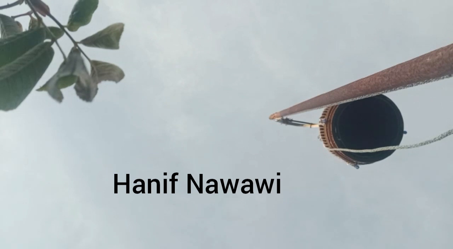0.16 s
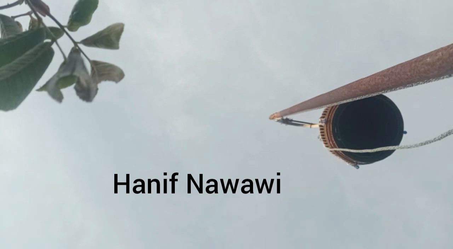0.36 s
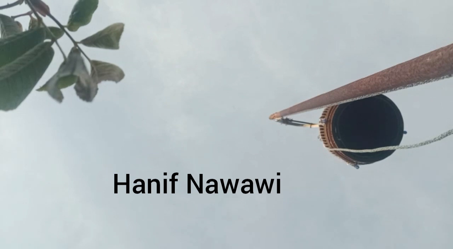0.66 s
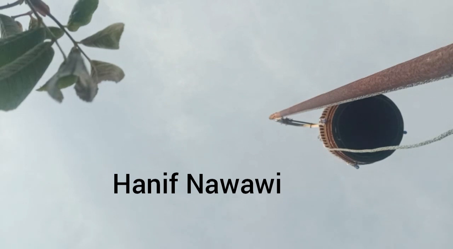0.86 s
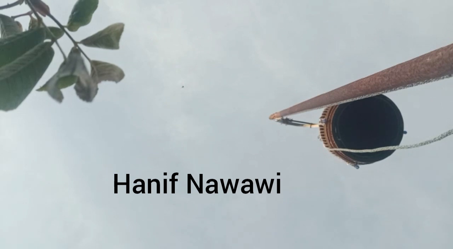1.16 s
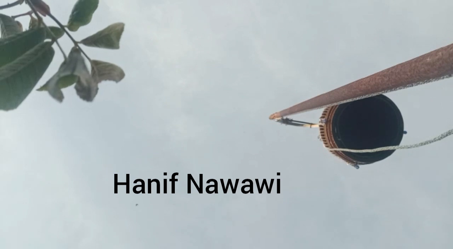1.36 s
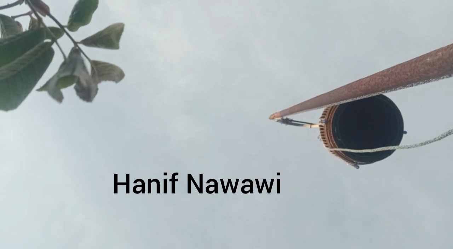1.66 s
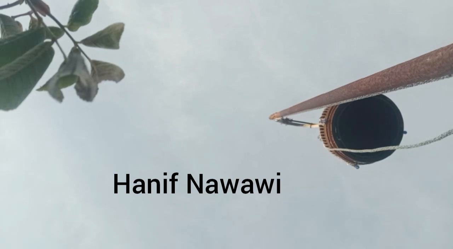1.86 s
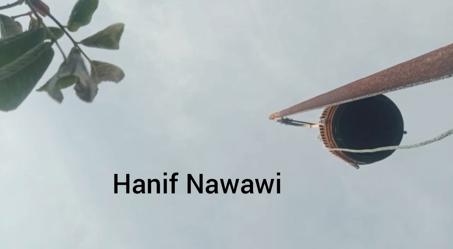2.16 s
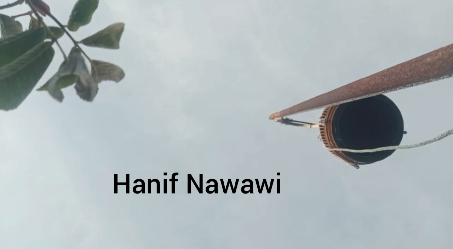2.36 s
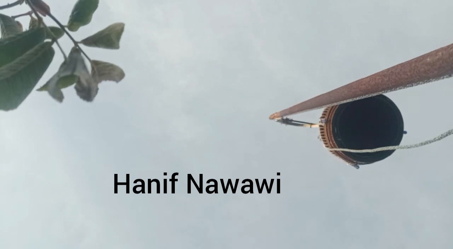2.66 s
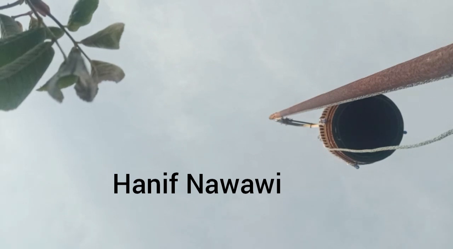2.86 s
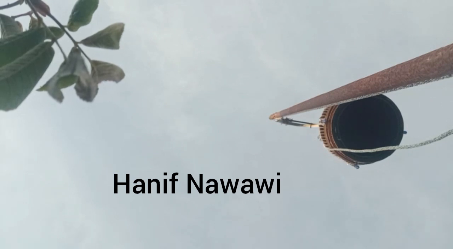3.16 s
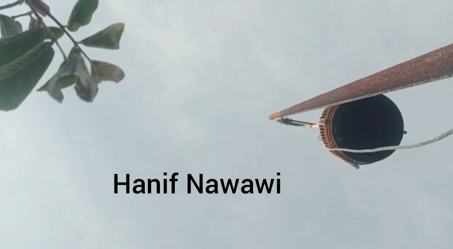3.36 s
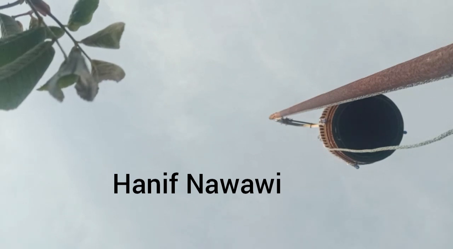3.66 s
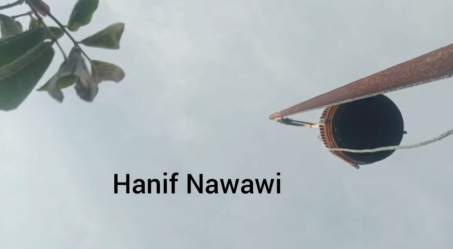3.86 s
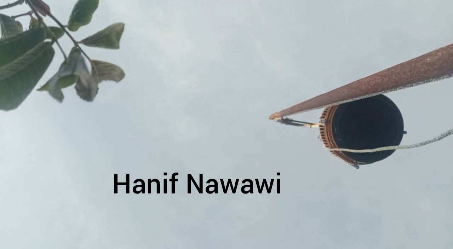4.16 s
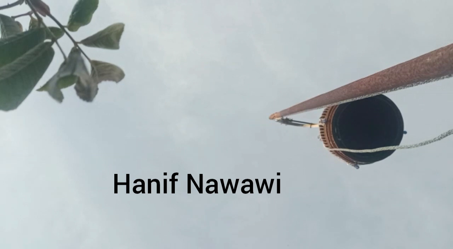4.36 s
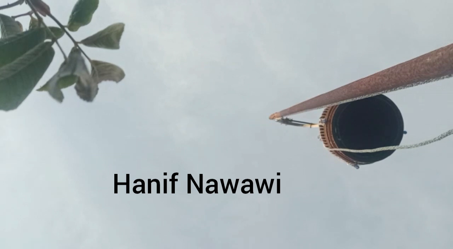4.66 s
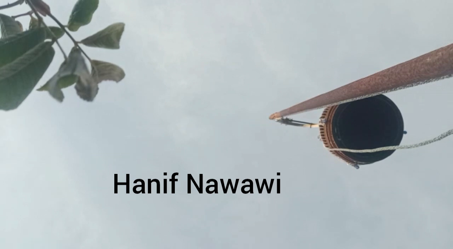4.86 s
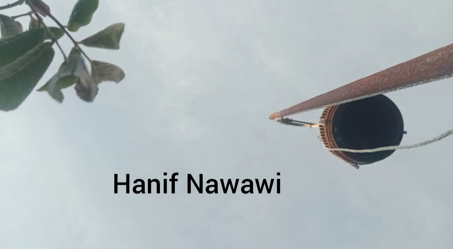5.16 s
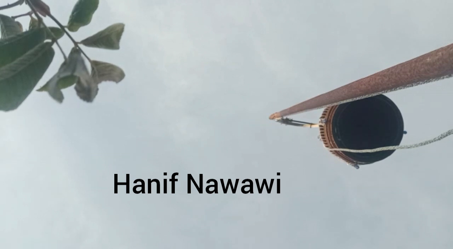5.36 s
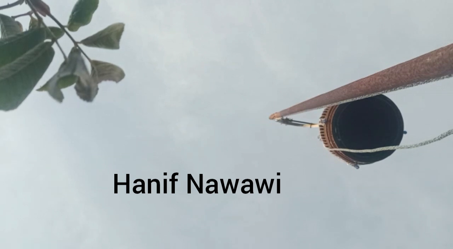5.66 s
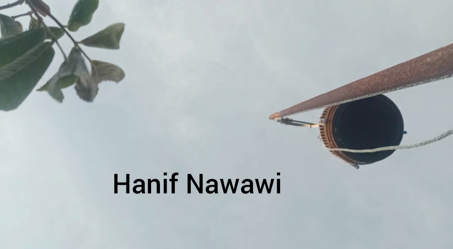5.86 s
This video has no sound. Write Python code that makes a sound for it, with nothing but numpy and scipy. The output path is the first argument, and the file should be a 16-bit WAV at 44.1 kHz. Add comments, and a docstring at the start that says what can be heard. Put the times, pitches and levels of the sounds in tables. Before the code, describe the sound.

Near dove coos, with a brief growl and a rolled note, over faint yard air, bird chirps and a late raspy trill.

```python
"""In a yard hung with cages, doves coo close by in near-sine notes that the walls and yard return.
Small birds are swept sines: a falling series and single chirps; another rattles hoarsely on pulsed noise.
An insect buzzes in pulsed noise. Shaped noise gives rustles, air, distant traffic, far doves and insects,
and far small birds are short whistles heard only as echo. The echoes and far background dip briefly.
The microphone adds hiss and the top of the treble is cut."""
import sys
import numpy as np
from scipy import signal
from scipy.fft import rfft, irfft, next_fast_len
from scipy.io import wavfile
from scipy.ndimage import uniform_filter1d

SR = 44100
rng = np.random.default_rng(int(sys.argv[2]) if len(sys.argv) > 2 else 0)


def to_wav(s):
    """Save 16-bit WAV."""
    ch = np.atleast_2d(s).T  # columns
    pcm = np.round(np.clip(ch, -1, 1) * 32767)  # PCM
    wavfile.write(sys.argv[1], SR, pcm.astype(np.int16))


N = 265041
T = np.arange(N) / SR


def amp(db):
    """Decibels to gain."""
    return 10 ** (np.asarray(db) / 20)


def rms_one(x):
    """Scale to unit rms."""
    return x / np.sqrt(np.mean(x ** 2) + 1e-20)


def in_time(rows):
    """Columns of a curve, first column in seconds, at every sample."""
    s, *columns = np.transpose(rows)
    return [np.interp(T, s, c) for c in columns]


def from_points(points):
    """Gain for each frequency from a short spectrum, straight lines over log frequency."""
    hz, level_db = np.transpose(points)
    return lambda f: amp(np.interp(np.log(f), np.log(hz), level_db))


def window(start, end, edge):
    """One between start and end, with ramps inside."""
    return np.clip(np.minimum(T - start, end - T) / edge, 0, 1)


def add(out, start, sound):
    """Mix a short sound in at a time in seconds."""
    i = max(int(round(start * SR)), 0)
    out[i:i + len(sound)] += sound[:N - i]


def sine(hz):
    """A sine that follows a pitch curve."""
    return np.sin(2 * np.pi * np.cumsum(hz) / SR)


def shaped_noise(gain_at):
    """White noise coloured by a gain for each frequency; rms 1."""
    size = next_fast_len(N)
    hz = np.maximum(np.fft.rfftfreq(size, 1 / SR), 1)
    return rms_one(irfft(rfft(rng.standard_normal(size)) * gain_at(hz), size)[:N])


def band(hz, width_hz):
    """Noise twice through a resonance; at 0 Hz it is a slow waver. Rms 1."""
    return shaped_noise(lambda f: 1 / (1 + (2 * (f - hz) / width_hz) ** 2))


def throb(per_s, sharp):
    """An uneven train of smooth bumps; rms 1."""
    phase = np.cumsum(per_s * (1 + 0.073 * band(0, 10.1))) / SR
    return rms_one(np.exp(sharp * np.cos(2 * np.pi * phase)))


def traffic():
    """Distant traffic: low noise shaped to a rumble, lumpy in level."""
    # rumble spectrum before scaling to rms 1: frequency_hz, density_db (per Hz)
    rumble_spectrum = [(25, -31.5), (45, -8), (60, -9), (69, 4), (80, 1), (110, 0), (145, -1.5), (160, 2.5),
                       (178, 0.5), (260, -49.5)]
    # slow rise and fall: time_s, level_db
    traffic_levels = [(0, -61.5), (1.8, -62), (2.5, -56), (3.3, -60.5), (3.9, -63.5), (4.5, -55),
                      (5.0, -59.5), (5.5, -64), (5.8, -54), (6.01, -59)]
    level_db = in_time(traffic_levels)[0] + 2.5 * band(0, 3.3)
    return amp(level_db) * shaped_noise(from_points(rumble_spectrum))


def murmur():
    """Far doves blurred to two narrow bands of noise."""
    # murmur before a 3.5 dB cut: time_s, level_db
    murmur_levels = [(0, -71), (2.3, -63), (2.6, -57), (3.9, -60), (4.35, -49), (5.1, -61.5), (5.5, -64.5),
                     (5.75, -52.5), (6.01, -65)]
    blur = rms_one(band(326.2, 56) + .5 * band(413, 30))
    return amp(in_time(murmur_levels)[0] - 3.5) * blur


def air():
    """Open air of the yard: octave bands of noise, each wavering in its own way."""
    air_db = -61.5
    # air spectrum before scaling to rms 1: frequency_hz, density_db (per Hz)
    air_spectrum = [(160, -26.5), (220, -6), (500, -9.5), (1000, -13), (2000, -22.5), (4000, -27),
                    (6500, -33), (8200, -38.5), (10000, -27.5), (12500, -55.5)]
    colour, out = from_points(air_spectrum), 0
    for octave_hz in 250 * 2. ** np.arange(7):
        part = lambda f: colour(f) * np.clip(1 - np.abs(np.log2(f / octave_hz)), 0, 1) ** .5
        weight = np.sqrt(octave_hz) * colour(octave_hz)
        out = out + weight * shaped_noise(part) * amp(2.7 * band(0, 36))
    return amp(air_db) * rms_one(out)


def drones():
    """Far insects as narrow bands of noise that waver in level."""
    # insect bands: centre_hz, width_hz, level_db
    drone_bands = [(1263.5, 70, -69), (1680, 250, -78), (5846, 180, -81.5)]
    return sum(amp(db + 4.2 * band(0, 16)) * band(hz, width_hz) for hz, width_hz, db in drone_bands)


def chorus():
    """Many far insects blurred to a wavering band of noise."""
    # insect chorus: time_s, level_db
    chorus_levels = [(0, -86), (.4, -84), (.7, -74), (1.05, -66.5), (1.15, -81), (1.7, -73), (2.4, -65),
                     (2.62, -86), (3.45, -72.5), (4.0, -80), (4.5, -72), (5.45, -75), (6.01, -71)]
    blur = shaped_noise(lambda f: 1 / (1 + ((f - 7150) / 380) ** 4))
    return amp(in_time(chorus_levels)[0] + 2.8 * band(0, 42)) * blur


def twitter():
    """Far small birds: short random whistles, roughened by a fast random waver."""
    per_s, weakest_db = 40, -75
    out = np.zeros(N)
    for when, pitch, slope, size, span in rng.random((int(per_s * N / SR), 5)):
        t = np.arange(int((0.016 + 0.034 * span) * SR)) / SR
        hz = 1700 * 4 ** pitch * (1 + 4.0 * (slope - .6) * t)
        add(out, when * N / SR, amp(weakest_db + 8 * size) * np.hanning(len(t)) * sine(hz))
    return out * band(0, 87)


def rustles():
    """Leaves or feathers: soft bursts of grainy noise through a low-pass."""
    # bursts, level before the low-pass: start_s, length_s, level_db, lowpass_hz
    rustle_bursts = [(0, 0.056, -49, 5700), (4.047, 0.17, -47, 4150), (4.257, 0.12, -48.5, 4460),
                     (5.075, 0.11, -48.5, 6230), (5.685, 0.14, -45.5, 4560)]
    out = np.zeros(N)
    grain = shaped_noise(lambda f: f / (2500 + f)) * amp(2.2 * band(0, 400))
    for s, length, db, top_hz in rustle_bursts:
        burst = grain[int(abs(s) * SR):][:int(length * SR)]
        soft = signal.lfilter(*signal.butter(3, top_hz, fs=SR), burst)
        add(out, s, amp(db) * np.hanning(len(burst)) * soft)
    return out


def buzz():
    """One insect: a pulsed band of noise in regular phrases."""
    centre_hz, width_hz, level_db, pulses_per_s = 9110, 270, -81, 84
    first_s, every_s, phrase_s = -.635, 1.134, .92
    into = (T - first_s) % every_s
    phrases = np.clip(np.minimum(into, phrase_s - into) / 0.01, 0, 1)
    return amp(level_db) * phrases * band(centre_hz, width_hz) * throb(pulses_per_s, sharp=0.35)


def rattle():
    """Fast noisy pulses ring a throat resonance; each syllable swells and fades."""
    # hoarse syllables: start_s, level_db
    syllable_rows = [(3.4, -56.5), (3.618, -59), (3.853, -57), (4.07, -60.5), (4.3, -54.5), (4.51, -54),
                     (4.738, -52.5), (4.974, -55.5), (5.21, -57.5), (5.438, -55.5), (5.671, -52.5),
                     (5.913, -53.5)]
    pulses_per_s, width_hz, syllable_s = 64, 557, 0.085
    throat_hz, extra_hz, settle_s = 2987, 480, .25   # the first syllables are higher
    rest_db = -61.5   # the throat keeps rattling faintly between syllables
    first_s = syllable_rows[0][0]
    hz = throat_hz + extra_hz * np.exp(-np.maximum(T - first_s, 0) / settle_s)
    voice = rms_one(sine(hz) * band(0, width_hz) * throb(pulses_per_s, sharp=0.38))
    syllables = sum(amp(db) * window(s, s + syllable_s, syllable_s / 3) for s, db in syllable_rows)
    return voice * (syllables + amp(rest_db) * window(first_s, 2 * N / SR, 0.81))


def chirps(notes, harshness):
    """Sine sweeps that settle on a held pitch; wider sweeps are harsher, their level more unsteady."""
    out, harsh = np.zeros(N), band(0, 800)
    for s, sweep, from_hz, to_hz, held, level_db in notes:
        t = np.arange(int((sweep + max(held, 0)) * SR)) / SR
        hz = to_hz + (from_hz - to_hz) * np.clip(1 - t / sweep, 0, 1) ** 1.2
        octaves = abs(np.log2(from_hz / to_hz))
        unsteady = 1 + harshness * octaves * harsh[int(abs(s) * SR):][:len(t)]
        swell = np.abs(np.sin(np.pi * t / t[-1])) ** .5
        add(out, s, amp(level_db) * unsteady * swell * sine(hz))
    return out


def falling_song():
    """A small bird sings a falling series of clear notes, some led in by a slight downward slide."""
    # notes; the sweep waits for the lead-in: start_s, lead_in_s, from_hz, to_hz, level_db
    song_notes = [(0.934, 0.0052, 9300, 8500, -63), (1.129, 0.0048, 9080, 8310, -60),
                  (1.34, 0.0026, 8630, 7830, -59.5), (1.552, 0, 8300, 7480, -55),
                  (1.755, 0, 8000, 7290, -53), (1.938, 0, 7800, 7250, -54.5),
                  (2.128, 0.006, 7300, 5900, -58.5), (2.31, 0.016, 7170, 5650, -59.5),
                  (2.489, 0.016, 7210, 5546, -61.5)]
    sweep_s, held_s = .02, .024
    song = [(s + lead, sweep_s, from_hz, to_hz, held_s, db) for s, lead, from_hz, to_hz, db in song_notes]
    for s, lead, from_hz, _, db in song_notes:
        if lead > .005:
            song.append((s, lead + .004, 1.03 * from_hz, from_hz, 0, db))
    return chirps(song, harshness=1.0)


def single_chirps():
    """Other small birds: single sweeps, each briefly held at its end."""
    # sweeps: start_s, sweep_s, from_hz, to_hz, level_db
    sweep_rows = [ (0, 0.0062, 7500, 6530, -51), (.36, 0.086, 3250, 2810, -64),
                  (.66, 0.11, 4320, 3660, -73.5), (.75, 0.42, 3473, 3170, -69.5),
                  (.964, 0.023, 4940, 6650, -57.5), (.999, 0.037, 3480, 2545, -65),
                  (1.165, 0.017, 5120, 3500, -54.5), (1.5, 0.042, 3900, 2526, -64),
                  (1.79, 0.042, 3500, 2600, -64.5), (1.924, 0.026, 5100, 7030, -51),
                  (2.539, .069, 4510, 2390, -66.5), (2.618, 0.03, 4300, 2720, -67),
                  (2.821, .045, 5530, 3340, -57), (4.767, 0.021, 4980, 6380, -56),
                  (4.973, 0.045, 4980, 6040, -56), (5.639, 0.082, 3430, 3970, -55), ]
    held_s = 0.0091
    sweeps = [(s, sweep, from_hz, to_hz, held_s, db) for s, sweep, from_hz, to_hz, db in sweep_rows]
    return chirps(sweeps, harshness=1.0)


def near_chirps():
    """A nearer small bird: swept sines sent straight to the microphone, with no echo."""
    # sweeps: start_s, sweep_s, from_hz, to_hz, held_s, level_db
    near_rows = [(3.27, 0.027, 6550, 7130, 0.029, -53.5), (3.3, 0.017, 7270, 6360, 0.023, -65),
                 (3.46, .012, 8130, 7700, 0.02, -60), (3.565, 0.052, 6850, 7020, .0, -49),
                 (3.605, 0.025, 7000, 5950, 0.012, -54.5)]
    return chirps(near_rows, harshness=0.99)


def whistle(hz, octave_db):
    """A near sine with a weak second partial; the first partial has rms 1."""
    phase = 2 * np.pi * np.cumsum(hz) / SR
    return np.sqrt(2) * (np.sin(phase) + amp(octave_db) * np.sin(2 * phase))


def coos(notes, octave_db, flutter_hz):
    """The inflated crop leaves almost one partial; hoarseness trades it for one that flutters in strength."""
    out, flutter = np.zeros(N), band(flutter_hz, 0.65 * flutter_hz)
    for rows in notes:
        hz, level_db, hoarse = in_time(rows)
        hz = uniform_filter1d(hz, size=400)   # the pitch bends smoothly
        hoarse = np.clip(hoarse, 0, 1)
        voice = (np.sqrt(1 - hoarse) + np.sqrt(hoarse) * flutter) * whistle(hz, octave_db)
        out += window(rows[0][0] - .004, rows[-1][0] + 0.004, 0.0079) * amp(level_db) * voice
    return out


def arches(notes):
    """Rise, hold, fall: pitch and level move together, and the voice is hoarser the weaker it is."""
    rise_db, fall_db = 20.5, 33     # how far below the held level a note starts and ends
    rise_bow, fall_bow = .6, .38    # share of that depth halfway through rise and fall
    swell_db = 0.5                  # the held part grows
    hold_sag = .13                  # share of the pitch drop spent while the note is held
    hoarse_per_db = 0.08
    below = np.array([rise_db, rise_bow * rise_db, 2 * swell_db, swell_db, swell_db / 2,
                      0, fall_bow * fall_db, fall_db])
    curves = []
    for s, rise, hold, fall, start_hz, top_hz, end_hz, level_db, hoarse in notes:
        steps = [0, rise / 2, rise / 6, rise / 3, hold / 2, hold / 2, fall / 2, fall / 2]
        times = s + np.cumsum(np.abs(steps))
        climb_hz = start_hz + (top_hz - start_hz) * np.array([0, .55, .75, 1, 1])
        held_hz = top_hz - hold_sag * (top_hz - end_hz)
        hz = [*climb_hz, held_hz, (held_hz + end_hz) / 2, end_hz]
        hoarseness = hoarse + hoarse_per_db * np.maximum(below - swell_db, 0)
        curves.append(np.transpose([times, hz, level_db - below, hoarseness]))
    return curves


def low_coos():
    """Other doves: arched notes with a clear octave above."""
    # notes: start_s, rise_s, hold_s, fall_s, start_hz, top_hz, end_hz, level_db, hoarseness (0-1)
    low_notes = [(-.02, 0.017, 0.025, 0.015, 555, 546, 537, -45.5, .1),
                 (.35, 0.049, 0.23, .1, 540.7, 554, 479, -39, 0.4),
                 (1.37, 0.0628, .25, 0.064, 548, 525.4, 468, -40.5, 0.01),
                 (2.41, 0.068, 0.073, 0.054, 740, 772, 820, -48.5, 0.44),
                 (3.68, 0.13, 0.064, 0.28, 650, 658, 567, -58.5, 0.17),
                 (5.77, 0.0515, 0.16, 0.24, 615, 776, 456, -48.5, 0.37)]
    return coos(arches(low_notes), octave_db=-19.0, flutter_hz=58.0)


def pulses(events, first_length, shortens, slide, octave_db):
    """Short puffs of tone, each sliding up to its pitch from a share below; along the run they shorten."""
    out = np.zeros(N)
    for s, level_db, hz in events:
        length = first_length * (1 - shortens * (s - events[0][0]))
        u = np.linspace(0, 1, int(length * SR))
        shape = np.abs(np.sin(np.pi * u ** 0.65)) ** 1.4
        tone = whistle(hz * (1 - slide * np.exp(-3.5 * u)), octave_db)
        add(out, s - .004, amp(level_db - 4) * shape * tone)
    return out


def growl():
    """A second dove growls: a run of tone pulses whose pitch sags."""
    # pulses, level before a 4 dB cut: time_s (4 ms into the pulse), level_db
    growl_pulses = [(.996, -23), (1.028, -31.5), (1.078, -24.5), (1.112, -35), (1.149, -25.5), (1.191, -28),
                    (1.229, -29), (1.26, -31.5), (1.291, -37), (1.326, -40), (1.348, -35.5), (1.364, -37),
                    (1.385, -33), (1.432, -35)]
    first_hz, sag_hz_per_s, first_pulse_s = 623, 127, 0.03
    shortens = 0.93   # share of length lost per s
    events = [(s, db, first_hz - sag_hz_per_s * (s - growl_pulses[0][0])) for s, db in growl_pulses]
    return pulses(events, first_pulse_s, shortens, slide=.04, octave_db=-22)


def rasp():
    """Breath noise through the throat over the growl, wavering and fading."""
    start_s, end_s, edge_s = 0.918, 1.532, 0.07
    first_db, fade_db_per_s = -46, 2
    level_db = first_db - fade_db_per_s * (T - start_s) + 2.6 * band(16, 30)
    return window(start_s, end_s, edge_s) * amp(level_db) * band(682, 280)


def roll():
    """The near dove's rolled note: tone pulses that each slide upward."""
    # pulses, level before a 4 dB cut: time_s (4 ms into the pulse), level_db, top_hz
    roll_pulses = [(2.534, -24.5, 727), (2.575, -23, 762), (2.611, -26.5, 756), (2.634, -24.5, 720),
                   (2.651, -22, 782), (2.678, -24.5, 770), (2.705, -21, 720), (2.723, -27, 691)]
    first_pulse_s = 0.036
    shortens = 0.89   # share of length lost per s
    return pulses(roll_pulses, first_pulse_s, shortens, slide=.12, octave_db=-48)


def long_coo():
    """Curve of time_s, pitch_hz, level_db, hoarseness for the near dove's opening coo."""
    # uneven swelling: time_s, level_db
    coo_levels = [(.322, -50), (.335, -36.5), (0.366, -38.5), (.4, -35.5), (0.531, -30.5), (0.564, -38.5),
                  (0.618, -25.5), (0.681, -30), (.708, -39.5), (0.724, -30.5), (.78, -35), (0.818, -24.5),
                  (.865, -36.5), (0.889, -29), (0.914, -35), (0.939, -32.5), (1.0, -39.5), (1.07, -42.5),
                  (1.351, -52), (1.4, -66)]
    # pitch curve: time_s, pitch_hz
    coo_pitch = [(.322, 570), (.36, 630), (.53, 648), (.6, 626), (.73, 618), (.82, 583), (.94, 558),
                 (1.07, 512), (1.22, 447), (1.4, 400)]
    hoarse_at_zero, clear_at_s = 0.31, 0.83   # hoarse at first, clear later
    s, level_db = np.transpose(coo_levels)
    hz = np.interp(s, *np.transpose(coo_pitch))
    return [np.transpose([s, hz, level_db, hoarse_at_zero * (1 - s / clear_at_s)])]


def near_coos():
    """The near dove: its long coo and arched notes, almost pure tones."""
    # arches: start_s, rise_s, hold_s, fall_s, start_hz, top_hz, end_hz, level_db, hoarseness (0-1)
    arch_notes = [(1.883, 0.013, 0.026, 0.18, 640, 714, 479.5, -36.5, 0.11),
                  (2.125, 0.092, .12, 0.07, 530, 730, 416, -29, 0.02),
                  (2.712, .04, 0.068, 0.27, 727, 715.3, 429.6, -28, 0.03),
                  (3.254, 0.054, .1, .15, 540.4, 704, 425, -27.5, 0.01),
                  (5.593, 0.015, .043, 0.034, 548, 682, 442, -30, 0.04),
                  (5.702, 0.0136, 0.0056, 0.074, 623, 508, 481, -34.5, .0)]
    return coos(long_coo() + arches(arch_notes), octave_db=-42, flutter_hz=55.6)


def walls(x):
    """Walls return a few distinct, delayed copies."""
    # echoes: delay_s, gain_db
    wall_echoes = [(.031, -27.5), (.095, -15.5), (.17, -30.5)]
    out = np.zeros(N)
    for delay, db in wall_echoes:
        add(out, delay, amp(db) * x)
    return out


def yard(x, t60):
    """Diffuse return: a burst of noise dying 60 dB in t60 seconds as impulse response."""
    t = np.arange(int(t60 * SR)) / SR
    tail = rng.standard_normal(len(t)) * amp(-60 * t / t60) * np.clip(100 * t, 0, 1)
    return signal.fftconvolve(x, tail / np.sqrt(np.sum(tail ** 2)))[:N]


def level_dips():
    """Gain that dips briefly, for the echoes and far background."""
    # dips: start_s, end_s, depth_db
    dip_rows = [(0.009, 0.339, -7.5), (1.733, 1.933, -4.5), (2.034, 2.114, -7), (3.035, 3.305, -7.5),
                (4.92, 4.988, -3.5), (5.37, 5.46, -5)]
    return amp(sum(db * window(start, end, .025) for start, end, db in dip_rows))


def scene():
    """Direct doves, birds, buzz and rustles over the dipping echoes and far background."""
    dove_yard_db, dove_yard_t60_s = -13, 0.38
    bird_direct_db, bird_yard_db, bird_yard_t60_s = -1, 3, .4
    doves = near_coos() + low_coos() + rasp() + growl() + roll()
    birds = falling_song() + single_chirps() + rattle()
    echoes = walls(doves) + amp(dove_yard_db) * yard(doves, dove_yard_t60_s)
    # the twitter arrives only as echo
    bird_echoes = amp(bird_yard_db) * yard(birds + twitter(), bird_yard_t60_s)
    faint = echoes + bird_echoes + air() + drones() + murmur() + traffic() + chorus()
    direct = doves + amp(bird_direct_db) * birds + near_chirps() + buzz() + rustles()
    return (direct + level_dips() * faint)[None]


def record(dry):
    """The microphone adds its hiss, and a steep low-pass cuts the top."""
    # hiss spectrum before scaling to rms 1: frequency_hz, density_db (per Hz)
    hiss_spectrum = [(7000, -12), (10500, -3), (13300, -8), (14300, 0), (16000, 0)]
    hiss_db, stopband_hz = -85, 15750
    hiss = amp(hiss_db) * shaped_noise(from_points(hiss_spectrum))
    low_pass = signal.cheby2(22, 50, stopband_hz, fs=SR, output="sos")   # 50 dB down in the stopband
    return signal.sosfilt(low_pass, dry + hiss)


dry = scene()
out = record(dry)
to_wav(out)
```